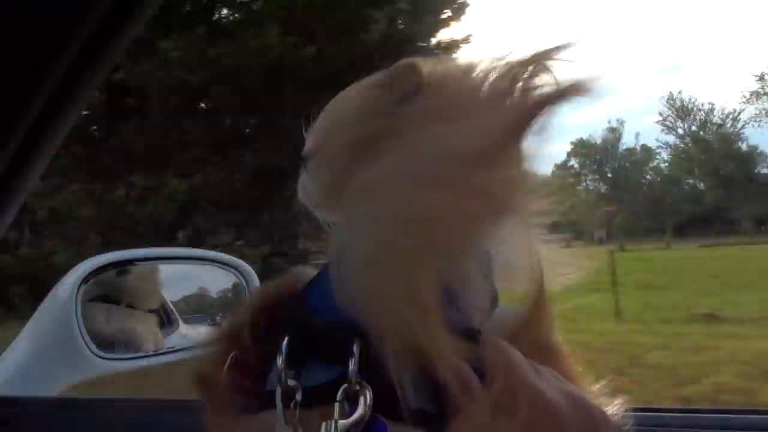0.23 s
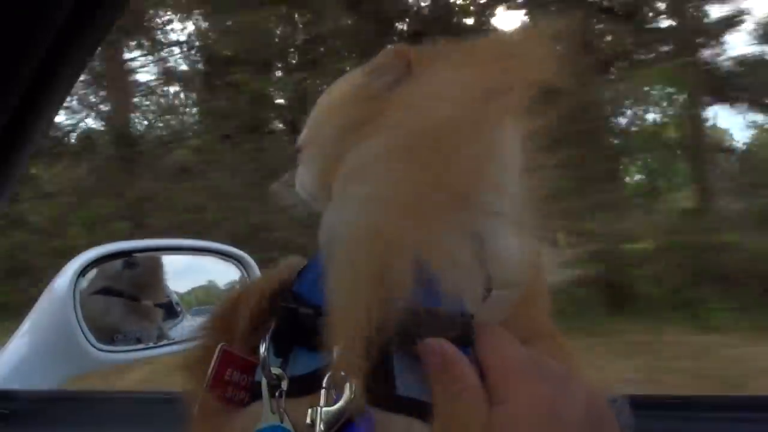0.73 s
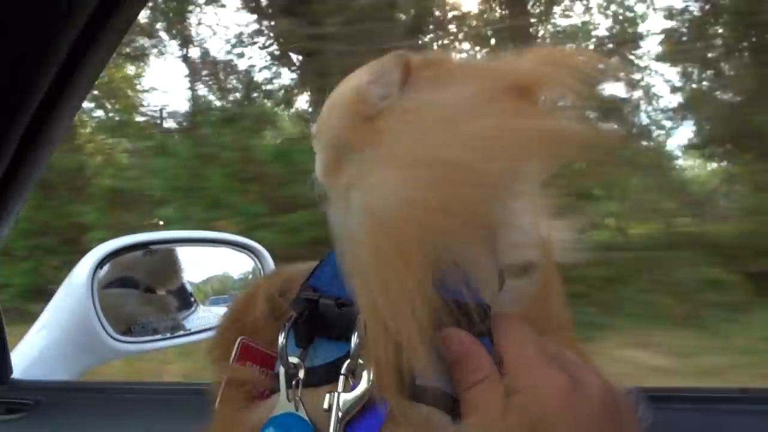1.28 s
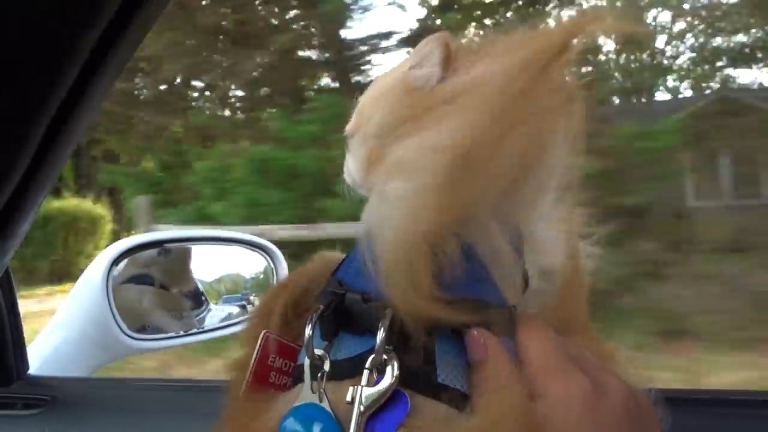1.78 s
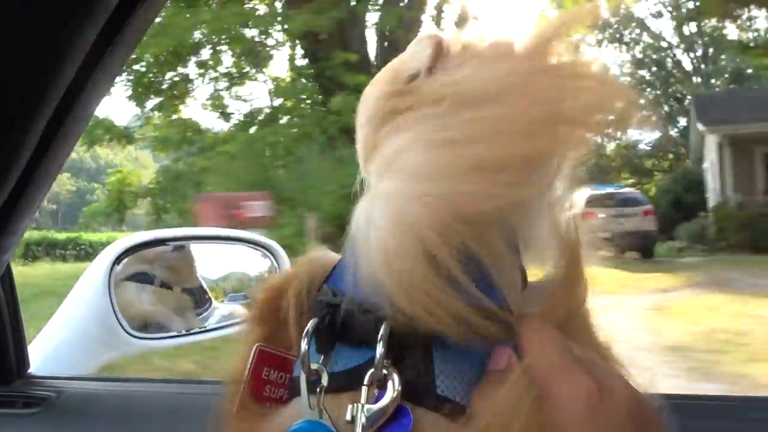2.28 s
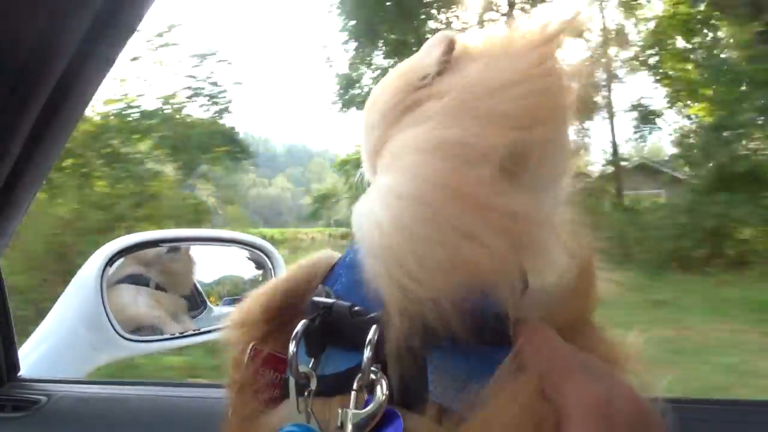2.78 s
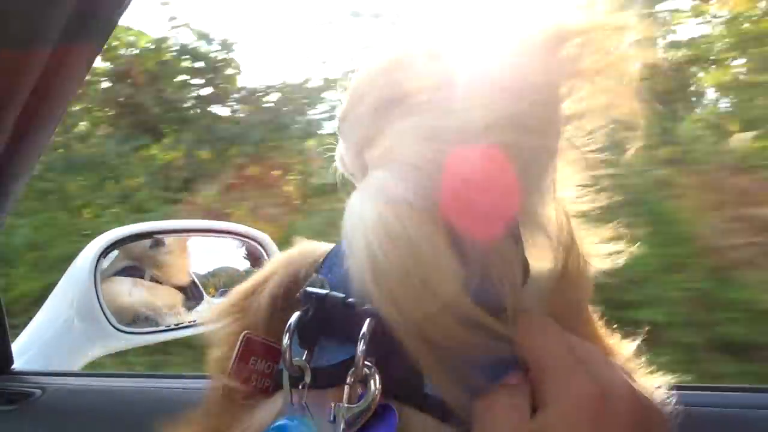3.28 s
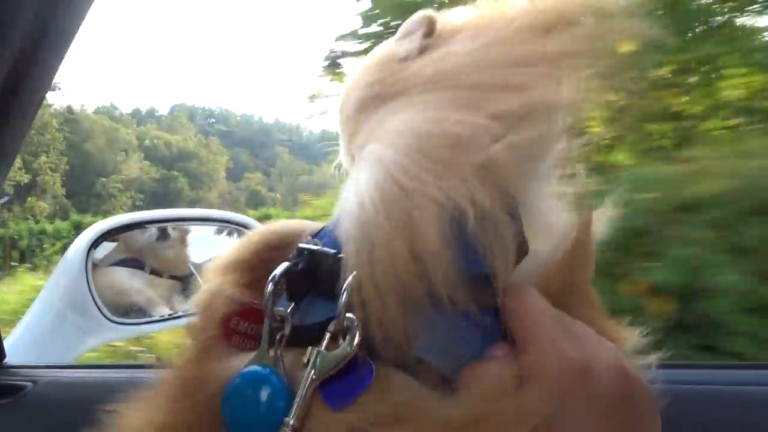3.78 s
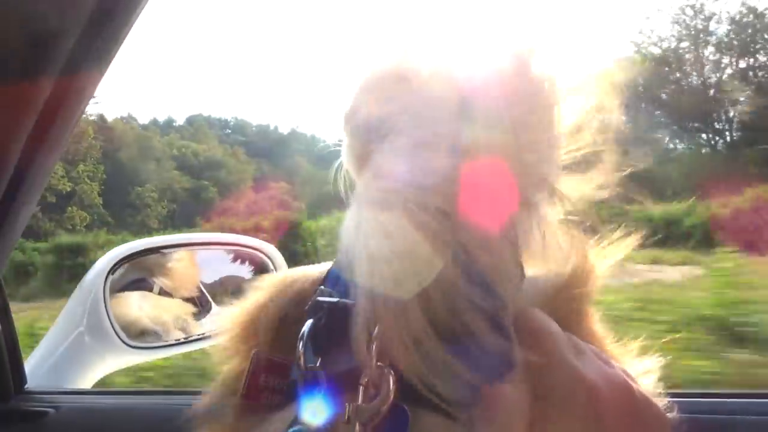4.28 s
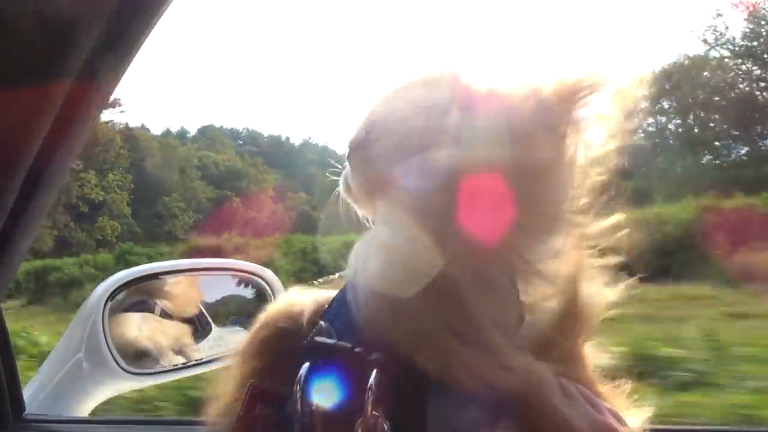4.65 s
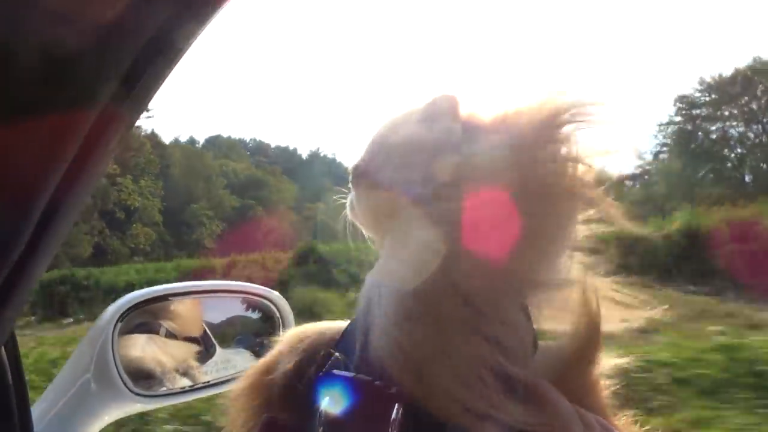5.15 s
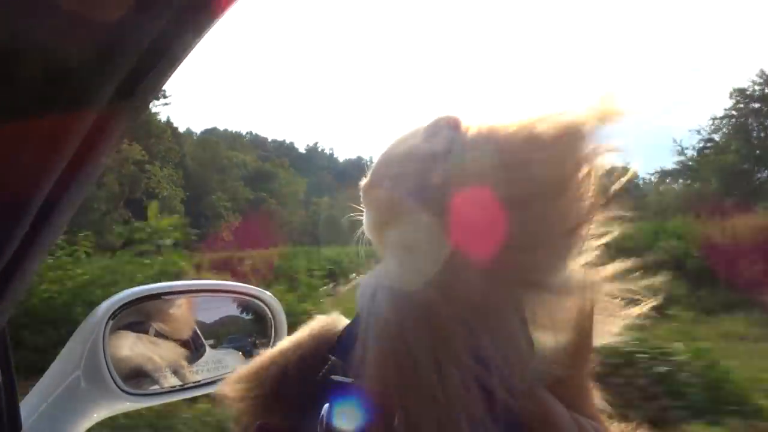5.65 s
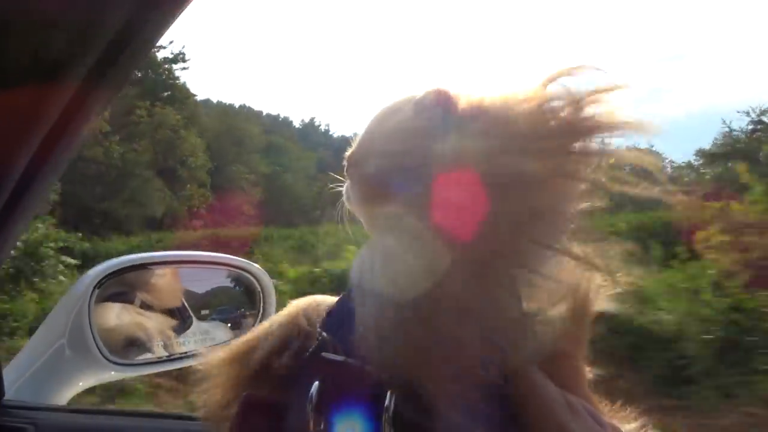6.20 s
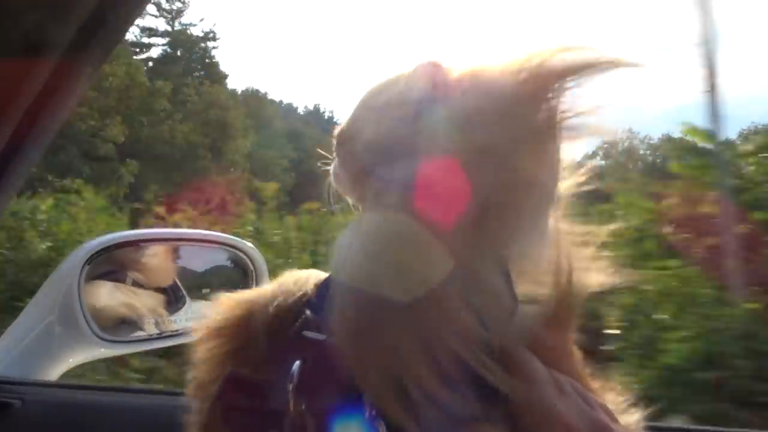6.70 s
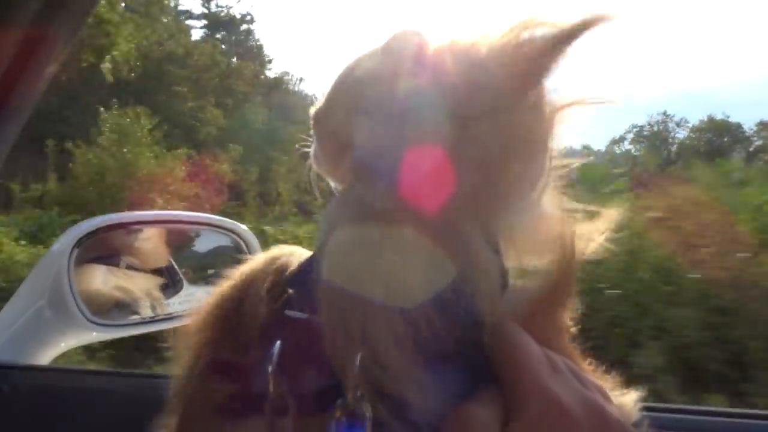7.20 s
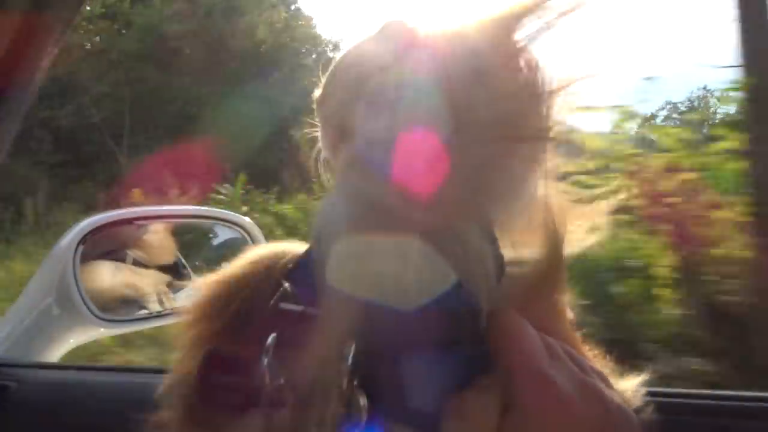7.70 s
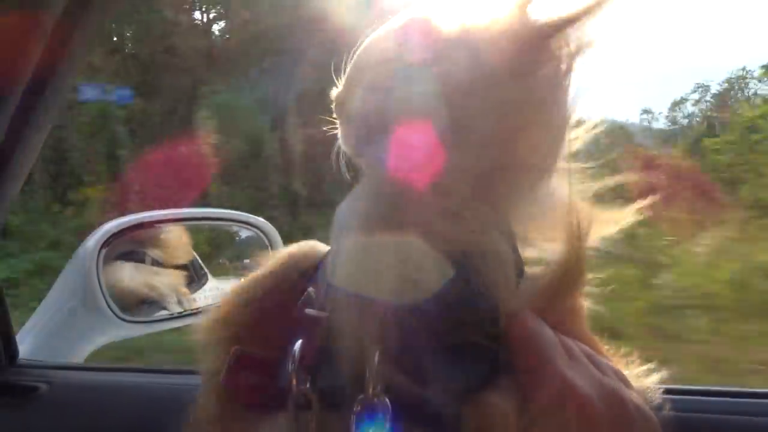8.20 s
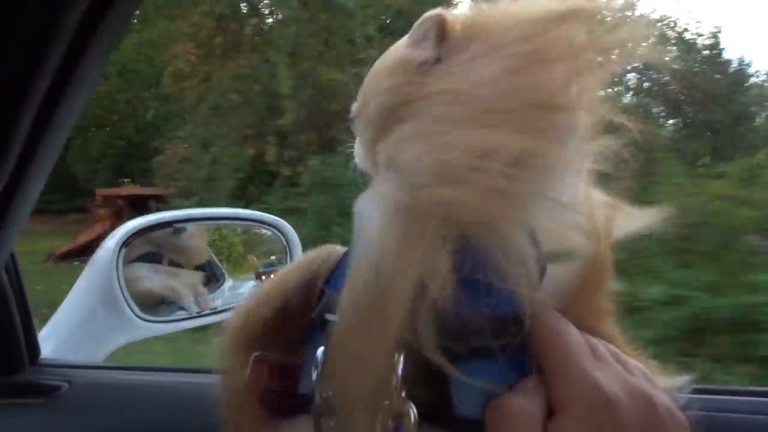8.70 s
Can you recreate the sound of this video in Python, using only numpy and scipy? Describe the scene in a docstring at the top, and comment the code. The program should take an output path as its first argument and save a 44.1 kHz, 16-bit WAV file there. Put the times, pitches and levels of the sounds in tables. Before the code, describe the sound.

A sports car's low exhaust is heard from inside the cabin, with road rumble, tyre roar and wind rushing at an open window throughout. The engine pulls at first and quickly softens. At about 1 second the throttle shuts and it becomes a hollow drone, sinking slightly in pitch, with soft body thumps near 1.1 and 1.6 seconds. From about 2.4 to 4.2 seconds the exhaust stumbles and burbles unevenly. Over the same stretch, faint high insects swell and fade, a dog's collar tags tick lightly, and trim gives dry clicks near 3.5 and 4.3 seconds. At about 4.3 seconds the engine pulls again with a slight rasp, then slowly climbs in pitch until the end, near 9 seconds. Another bump comes around 5.1 seconds, and passing trees add a soft whoosh near 8 seconds.

```python
"""A sports car's exhaust, heard from inside on a country road with the window open. Firing pulses ring
the pipe: it pulls, eases off into a hollow coasting drone that stumbles and burbles, then pulls again
and slowly climbs in pitch. Wind and tyres rush at the window, the body thumps over bumps, trim clicks,
a dog's collar tags tick, and insects shrill at the roadside."""
import sys
import numpy as np
from scipy import signal
from scipy.fft import rfft, irfft, next_fast_len
from scipy.io import wavfile
from scipy.ndimage import uniform_filter1d, map_coordinates

SR = 44100
rng = np.random.default_rng(int(sys.argv[2]) if len(sys.argv) > 2 else 0)


def wav_out(sig):
    """Save sig, one row per channel (or a flat mono array), as 16-bit PCM at SR to the path in sys.argv[1]."""
    wavfile.write(sys.argv[1], SR, np.round(np.clip(np.atleast_2d(sig).T, -1, 1) * 32767).astype(np.int16))


N = 394254
TIME_S = np.arange(N) / SR
LIFT_OFF_S, PULL_AWAY_S = 0.96, 4.335  # the throttle shuts, then opens again
PEDAL_SAG = 2.9  # crossfade exponent: the exhaust sags while the pedal moves


def engine():
    """One crankshaft times both voices of the exhaust, pulling and coasting."""
    # engine speed: time_s, firing_hz
    firing = [(0, 92.1), (.9, 93.3), (1.2, 92.4), (1.55, 90.9), (3, 86.8), (4.3, 84.6), (4.72, 84.5),
              (5.1, 85.1), (6.25, 89.9), (6.65, 91.3), (7.2, 92.5), (8.94, 94.8)]
    firing_hz = curve(firing) * (1 + 0.0017 * wobble(15))
    phase = 2 * np.pi * np.cumsum(firing_hz) / SR
    return pulling(firing_hz, phase) + coasting(firing_hz, phase)


def pulling(firing_hz, phase):
    """Open throttle: sharp pulses, each with a puff of gas that rasps as the pedal goes down."""
    # how hard the engine pulls: time_s, level_db
    effort = [(.1, 0.4), (.2, -4.5), (.35, -7.5), (4.42, -6), (4.55, -2), (5.5, -2), (6.6, -0.8), (6.9, -2),
              (7.6, -0.8)]
    uneven = 1 + 0.0067 * wobble(45) + 0.017 * np.cos(phase / 2)  # no two firings are quite alike
    tone = uneven * exhaust(firing_hz, phase, tilt=np.ones_like, lag_rad=np.pi / 2, rough=0.013)
    shake = amp(-43) * np.cos(phase / 2)  # the engine rocks once every two firings
    gas = colour([(150, -24), (350, 1), (600, -3), (1000, -6), (2500, -18.5), (6000, -42)])
    puffs = unit(((1 + np.cos(phase)) / 2) ** 2) * noise(gas, patchy_db=-2.5)
    age_s = since(PULL_AWAY_S)
    rasp = amp(16) * (age_s > 0) * np.exp(-age_s / 0.45)
    return throttle() ** PEDAL_SAG * amp(curve(effort)) * (tone + shake + amp(-47) * (1 + rasp) * puffs)


def coasting(firing_hz, phase):
    """Shut throttle: a round drone that collapses whenever stray firings burble in the pipe."""
    # stray firings: centre_s, length_s, depth (0-1)
    stumbles = [(1.068, 0.027, 0.6), (1.183, 0.017, 0.5), (2.354, 0.016, .3), (2.493, 0.046, 0.8),
                (2.6, 0.072, 0.4), (2.703, 0.073, 1), (2.846, 0.044, 0.7), (3.012, 0.088, 0.7),
                (3.142, 0.099, 0.7), (3.325, 0.017, 0.9), (3.442, 0.07, 0.9), (3.567, 0.044, .6),
                (3.721, 0.019, 0.6), (3.8, 0.031, 0.2), (3.87, 0.061, 0.7), (4.022, 0.031, 1),
                (4.189, .04, 1)]
    # softening of the pulses with the throttle shut: pitch_hz, gain_db
    softening = [(90, -0.5), (170, -6.5), (184, -8.5), (260, -7.5), (280, -10.5), (360, -7), (450, -16),
                 (550, -22), (900, -22)]
    shut = 1 - throttle()
    build_db = -2.8 * np.exp(-since(LIFT_OFF_S) / 0.5)  # the drone builds from a softer start
    steady = np.ones(N)
    for centre_s, length_s, depth in stumbles:
        steady *= 1 - 0.76 * depth * np.exp(-(2 * (TIME_S - centre_s) / length_s) ** 4)
    slip = 0.74 * (1 - steady) * wobble(25)  # the beat slips during a stumble
    tone = exhaust(firing_hz, phase + slip, tilt=colour(softening), lag_rad=-np.pi / 2, rough=0.05)
    drone = shut ** PEDAL_SAG * amp(build_db) * steady * tone
    gas = colour([(20, -11), (50, 3), (110, 3.5), (200, -5), (310, -6.5), (400, -8), (480, -18.5),
                  (1000, -60)])
    burble = noise(gas, patchy_db=2.5) * amp([[-1.5], [1]])
    # always a little burble, more when coasting, most in a run of stumbles
    crowding_s = sum(length_s * swell(centre_s, 0.6) for centre_s, length_s, _ in stumbles)
    unrest = np.tanh(crowding_s / 0.065)
    burble_gain = amp(-40.5) + amp(-40) * shut + unrest * amp(-25 + 6.1 * (0.5 - steady))
    return drone + burble_gain * burble


def exhaust(firing_hz, phase, tilt, lag_rad, rough, harmonics=13):
    """Firing pulses: their harmonics slide through the fixed resonances of the pipe."""
    # resonances of pipe and cabin: pitch_hz, width_hz, level_db
    pipe = [(84.8, 27.7, -10.5), (172.5, 12, -15.5), (253, 40, -25.5), (283.3, 12.7, -18.5), (341, 14, -25),
            (366.5, 21, -26), (427, 41, -32.5), (452.6, 18, -29.5), (476.4, 8.4, -26.5), (516, 6, -29.5),
            (531, 17, -26.5), (556.8, 28.4, -27.5), (592, 17, -37.5), (660, 56, -49), (737, 16, -48),
            (862, 32, -39.5), (1110, 140, -56.5)]
    limp = 0.032 * np.cos(phase / 2)  # uneven firing adds weak lines halfway between the harmonics
    tone = np.zeros((2, N))
    for k in range(1, harmonics + 1):
        hz = k * firing_hz
        gain = resonances(pipe, hz) * tilt(hz) * (1 + rough * k * wobble(15))
        skew = lag_rad * (k > 1)  # shifting the overtones against the fundamental skews the pulse
        tone += gain * standing_wave(k * (phase + limp) - skew, hz)
    return tone


def standing_wave(phase, hz):
    """The cabin's standing waves give a harmonic a different level and phase on each side."""
    # stereo image: pitch_hz, left_over_right_db, left_lead_rad
    image = [(90, -1, 0.21), (175.7, -4.5, 0.39), (187, -20.5, -1.3), (277, -4, 0.52), (360, -7, 0.44),
             (466, -8.5, -0.11), (560, -3, -0.27), (620, -6.5, 0.28), (1000, 8.5, -0.29)]
    sides = np.array([[0.5], [-0.5]])
    gain = amp(sides * along(image, hz, column=1))
    return np.sqrt(2) * gain / gain.mean(0) * np.cos(phase + sides * along(image, hz, column=2))


def throttle(travel_s=0.059):
    """The pedal: 1 while it is down, 0 while the car coasts."""
    moved = lambda at_s: np.clip((TIME_S - at_s) / travel_s + 0.5, 0, 1)
    return 1 - moved(LIFT_OFF_S) + moved(PULL_AWAY_S)


def wind_and_road():
    """The body rumbles, while tyre roar and window air share gusts and echo round the cabin."""
    # spectra of body rumble and tyre roar: pitch_hz, gain_db
    rumble_eq = [(15, -10), (28, 2), (45, 0.5), (62, -1), (120, -0.5), (220, 1), (380, -4.5), (520, -12),
                 (800, -25.5), (1500, -69)]
    tyre_eq = [(250, -33.5), (450, -2.5), (620, 0), (760, 0.5), (900, 3.5), (1000, -1), (1110, 1.5),
               (1300, -5), (1600, -10.5), (2100, -26), (4000, -64.5)]
    # tyre roar, changing with the road surface: time_s, level_db
    surface = [(.3, -37), (1.2, -36), (2.2, -33), (3.9, -34), (4.5, -33.5), (5.1, -34), (5.5, -37),
               (6.6, -37), (7.2, -34.5), (7.9, -33.5), (8.9, -36.5)]
    gust = wobble(9)
    rumble = amp(-28.5 + 1.9 * wobble(9.9)) * noise(colour(rumble_eq), patchy_db=-0.5)
    tyres = amp(curve(surface) + 0.5 * gust) * noise(colour(tyre_eq), patchy_db=0.5)
    return rumble + cabin_echoes(tyres + window_air(gust), wet=0.38)


def window_air(gust):
    """Air tears past the open window and sings in the gap; higher layers follow the wind more."""
    # wind at the window: time_s, strength_db
    wind = [(0.1, -56), (0.39, -58.5), (1.74, -49.5), (3.75, -50), (4.05, -51.5), (4.46, -50.5),
            (5.34, -54.5), (6.47, -52), (7.06, -53.5), (7.7, -48), (7.92, -50), (8.9, -51)]
    # spectra of the air, from low to high: pitch_hz, gain_db
    rush_eq = [(880, -20.5), (1500, -2), (1930, -2), (2180, 0), (2400, -6), (2920, -7), (3630, -10),
               (4010, -7.5), (4330, -9.5), (5200, -19), (6760, -53.5), (11400, -120)]
    hiss_eq = [(2880, -31), (4900, -1.5), (5160, -4), (6610, 1.5), (7110, -2.5), (7750, -1), (8600, -18),
               (11200, -43.5), (18900, -120)]
    sizzle_eq = [(7000, -21.5), (8600, -1), (9500, 0), (11000, -5.5), (13000, -14), (15500, -16)]
    # narrow resonances of window gap and trim: pitch_hz, width_hz, level_db
    gap_modes = [(2147, 61, 0), (4020, 66, -2.5), (5480, 110, -11), (5880, 160, -11.5), (6520, 150, -10.5)]
    flow_db = curve(wind) - curve(wind).mean()
    rush_db = -40.5 + 0.39 * flow_db + 0.33 * gust + 0.45 * wobble(50)
    rush = amp(rush_db) * noise(colour(rush_eq), patchy_db=0.72)
    speed_db = 0.2 * since(PULL_AWAY_S)  # the gap sings a little more as the car gathers speed
    gap_db = -50.3 + speed_db + 0.6 * flow_db + 0.49 * wobble(8.3)
    gap = amp(gap_db) * ringing(gap_modes, patchy_db=1.2)
    hiss = amp(-52.6 + flow_db + 0.4 * gust) * noise(colour(hiss_eq), patchy_db=1.5)
    bright_db = 4 * swell(centre_s=6.42, length_s=0.7)  # the finest hiss brightens for a moment
    sizzle_db = -63 + 1.15 * flow_db + bright_db + 0.5 * gust
    sizzle = amp(sizzle_db) * noise(colour(sizzle_eq), patchy_db=1.5)
    return (rush + gap) * amp([[0.5], [-0.5]]) + hiss + sizzle


def cabin_echoes(x, wet, count=14):
    """Glass and trim return close echoes that comb the sound."""
    echoes = np.zeros((2, SR // 40))
    for ear in echoes:
        ear[rng.integers(SR // 500, len(ear), count)] = wet * rng.standard_normal(count) / np.sqrt(count)
    return (x + signal.fftconvolve(x, echoes, axes=1)[:, :N]) / np.hypot(1, wet)


def body_thumps():
    """Bumps in the road knock the low resonances of the body."""
    # bumps: start_s, relative_db
    bumps = [(.42, -24.5), (1.055, -14.5), (1.587, -15), (3.33, -27), (5.12, -17)]
    modes = [(220, 120, -1), (412, 150, 4), (590, 160, -2.5), (1100, 460, -17.5)]
    return strikes(bumps, modes, t60_s=0.059, attack_s=0.0054, gain_db=-1)


def trim_clicks():
    """Harness clips and trim knock together with a dry click."""
    # contacts: start_s, relative_db
    clicks = [(2.369, -40.5), (3.4671, -23.5), (4.2892, -29.5)]
    modes = [(2800, 700, 1), (3920, 1100, -1.9), (5070, 400, -2)]
    return strikes(clicks, modes, t60_s=0.045, attack_s=0.0006, gain_db=-2.5)


def collar_tags():
    """A dog's tags touch and give short, bright ticks."""
    # touches: start_s, relative_db
    touches = [(2.7691, -44), (2.8437, -48), (2.9153, -46), (3.563, -44.5), (3.637, -44.5), (3.704, -52.5),
               (3.7838, -50.5), (4.225, -40.5), (4.3226, -49), (6.9062, -49.5)]
    modes = [(5600, 600, -1), (7900, 900, 3), (10500, 1800, -4), (13500, 2200, -1.5)]
    return strikes(touches, modes, t60_s=0.043, attack_s=0.0008, gain_db=0.5)


def tree_whoosh():
    """Trees close to the road throw the tyre noise back as they pass, and a short whoosh comes as the throttle
    opens."""
    # whooshes: the throttle opening, then trees and hedges: centre_s, length_s, level_db
    whooshes = [(4.5, 0.3, -48.5), (6.5, .9, -52.5), (7.92, 0.57, -42.5)]
    return passing(whooshes) * ringing([(2940, 280, 0.13), (2170, 160, 0.87)], patchy_db=-2)


def insects():
    """Two kinds of fluttering stridulation swell and fade as the car passes."""
    # high shrilling insects: centre_s, length_s, level_db
    shrillers = [(1.55, .4, -70), (2.15, .7, -63), (2.62, .55, -55), (3.5, 1.4, -62)]
    shrill_eq = [(7000, -48.5), (10500, -15.5), (13000, -6), (14800, 3.5), (15800, -3)]
    shrill = noise(colour(shrill_eq), patchy_db=0)
    buzz = ringing([(8000, 450, 0)], patchy_db=4)
    shrill *= passing(shrillers) * amp(0.7 * wobble(40))
    buzz *= swell(centre_s=3.5, length_s=1) * amp(-55.5 + 3.8 * wobble(60))
    return shrill + buzz


def strikes(events, modes, t60_s, attack_s, gain_db):
    """Each contact is a short dying burst in the resonances of the struck thing."""
    envelope = np.zeros(N)
    for start_s, relative_db in events:
        age_s = since(start_s)
        decay_db = 60 * np.minimum(age_s / t60_s, 2)
        envelope += amp(relative_db - decay_db) * (1 - np.exp(-age_s / attack_s))
    return amp(gain_db) * envelope * ringing(modes, patchy_db=2.5)


def ringing(modes, patchy_db):
    """Stereo noise coloured by a set of resonances."""
    return noise(lambda hz: resonances(modes, hz), patchy_db)


def noise(response, patchy_db):
    """Stereo noise of rms 1 with a given colour and drifting patches of level."""
    # likeness of left and right: pitch_hz, correlation (-1 to 1)
    likeness = [(40, 1), (200, 0.052), (500, 0.64), (1000, 0.8), (2200, 0.64), (4000, 0.16), (6000, -0.16),
                (9000, -0.16), (14000, 0.044)]

    def mid_and_side(hz):
        angle = np.arccos(np.clip(along(likeness, hz), -1, 1)) / 2
        return response(hz) * np.array([np.cos(angle), np.sin(angle)])

    spectra = signal.stft(rng.standard_normal((2, N)), nperseg=512)[2]
    patches = uniform_filter1d(rng.standard_normal(spectra.shape[1:]), size=5, axis=0)  # across pitch
    patches = uniform_filter1d(patches, size=14, axis=1)  # across time
    pair = signal.istft(spectra * amp(patchy_db * unit(patches)), nperseg=512)[1][:, :N]
    mid, side = filtered(pair, mid_and_side)
    return unit(np.array([mid + side, mid - side]))


def resonances(modes, hz):
    """Gain of steep-sided resonances: pitch_hz, width_hz, level_db."""
    return np.sqrt(sum(amp(db) ** 2 / (1 + 2 * ((hz - pitch_hz) / width_hz) ** 2) ** 2
                       for pitch_hz, width_hz, db in modes))


def colour(points):
    """An EQ curve through points: pitch_hz, gain_db."""
    return lambda hz: amp(along(points, hz))


def along(points, hz, column=1):
    """One column of a frequency table, read on a log axis."""
    columns = np.transpose(points)
    return np.interp(np.log(hz + 1), np.log(columns[0] + 1), columns[column])


def filtered(x, response):
    """Shape x with a gain for each frequency."""
    size = next_fast_len(N + SR // 4)
    return irfft(rfft(x, size) * response(np.fft.rfftfreq(size, 1 / SR)), size)[..., :N]


def passing(rows):
    """Joint gain of roadside things that each swell and fade."""
    return np.sqrt(sum((amp(db) * swell(centre_s, length_s)) ** 2 for centre_s, length_s, db in rows))


def swell(centre_s, length_s):
    """A bell-shaped rise and fall that peaks at 1."""
    return np.exp(-np.square(2 * (TIME_S - centre_s) / length_s))


def since(start_s):
    """Seconds since start_s, zero before it."""
    return np.maximum(TIME_S - start_s, 0)


def curve(points):
    """An automation line through points: time_s, value."""
    return np.interp(TIME_S, *np.transpose(points))


def wobble(rate_hz):
    """A smooth random curve with rate_hz knots a second."""
    return map_coordinates(rng.standard_normal(int(N * rate_hz / SR) + 4), [TIME_S * rate_hz])


def amp(db):
    """Decibels to gain."""
    return 10 ** (np.asarray(db) / 20)


def unit(x):
    """Scale to rms 1."""
    return x / np.sqrt(np.mean(x ** 2) + 1e-20)


def scene():
    """Engine, wind and the small sounds in and around the car."""
    knocks = collar_tags() + trim_clicks() + body_thumps()
    return engine() + wind_and_road() + knocks + tree_whoosh() + insects()


def record(dry, top_hz=15790):
    """A brick-wall low-pass takes off the very top."""
    return filtered(dry, lambda hz: hz < top_hz)


dry = scene()
out = record(dry)
wav_out(out)
```